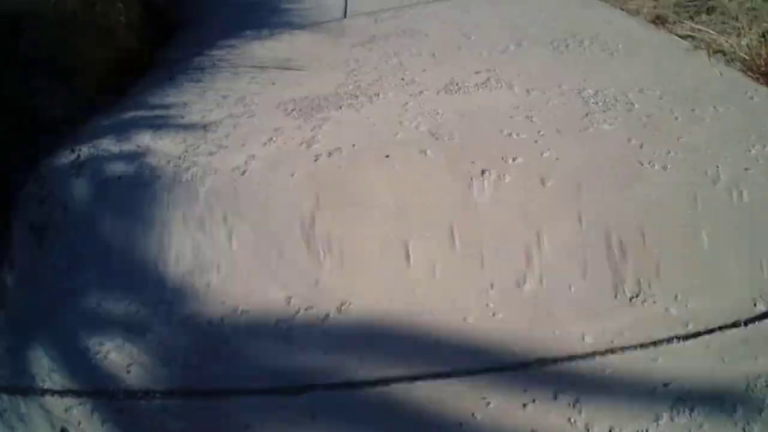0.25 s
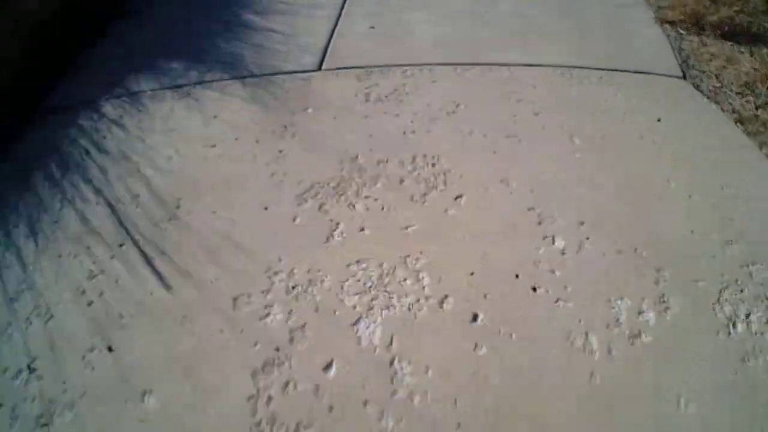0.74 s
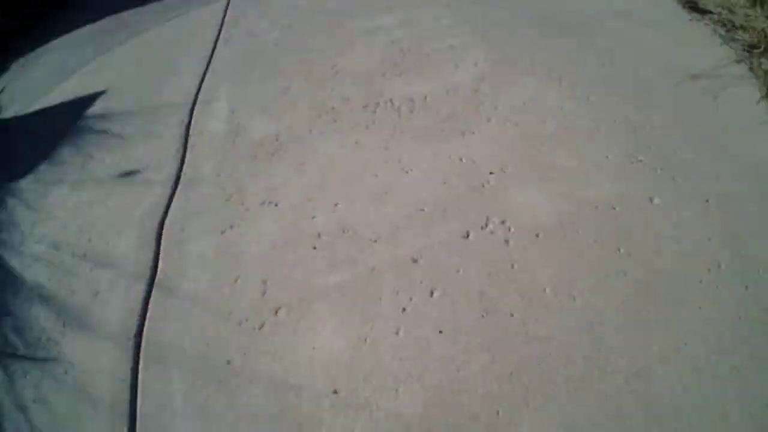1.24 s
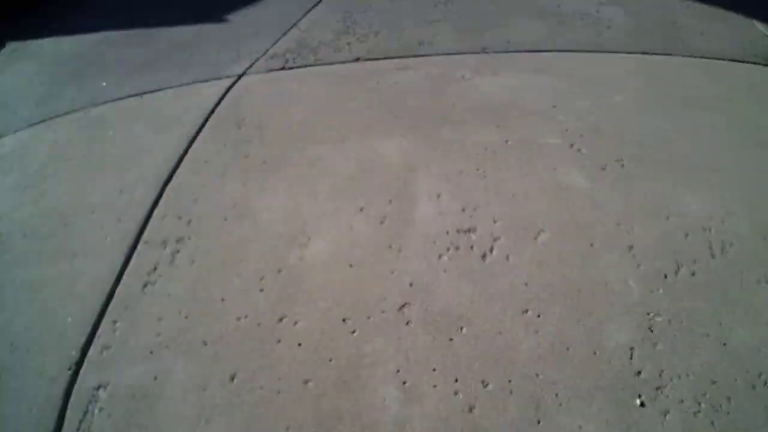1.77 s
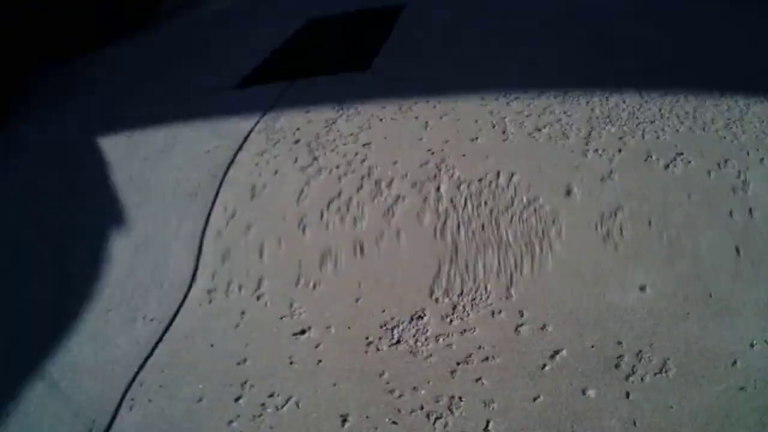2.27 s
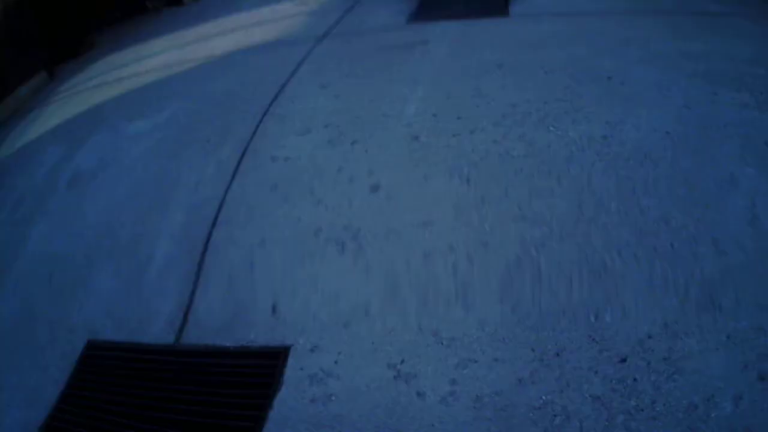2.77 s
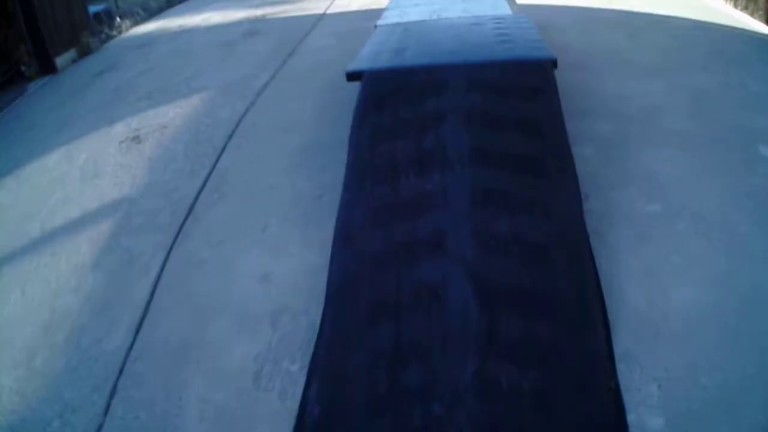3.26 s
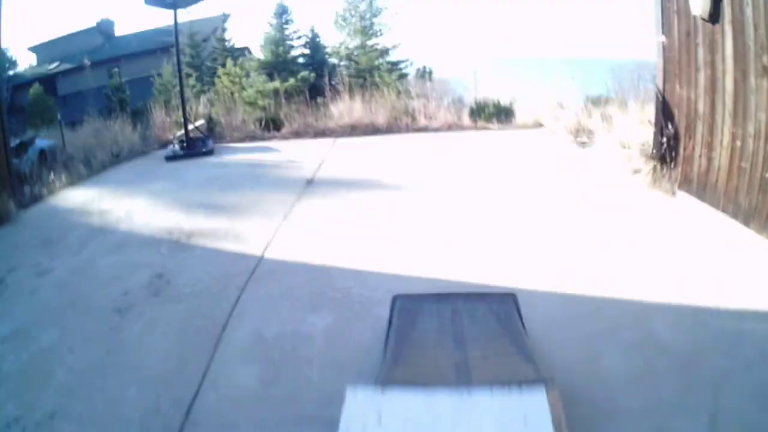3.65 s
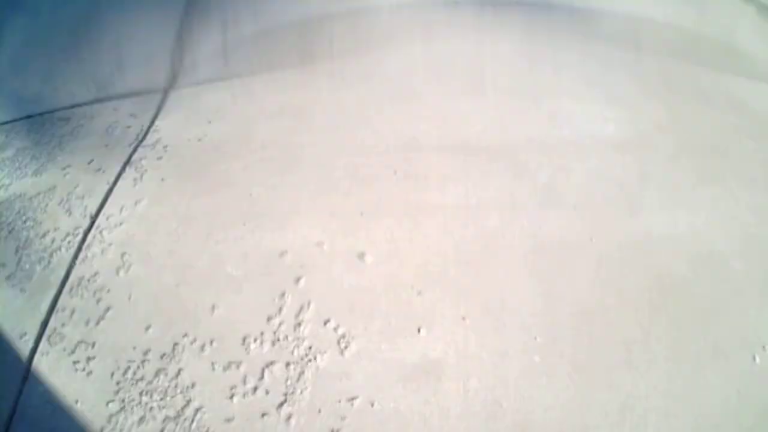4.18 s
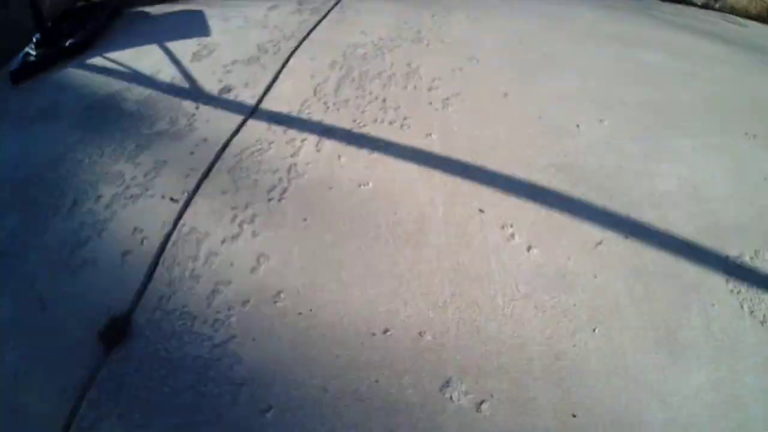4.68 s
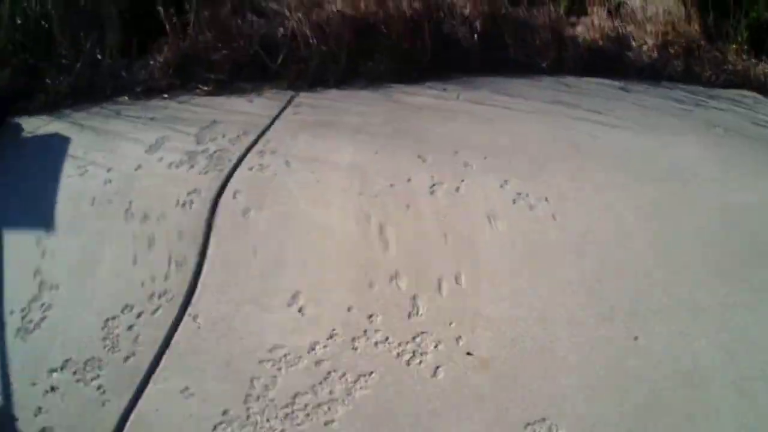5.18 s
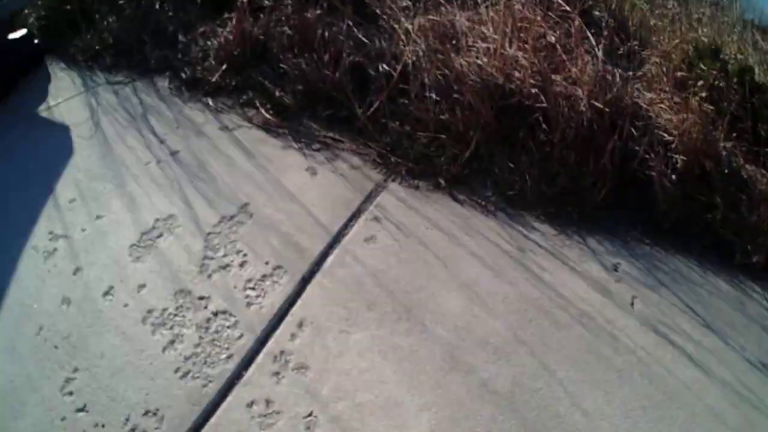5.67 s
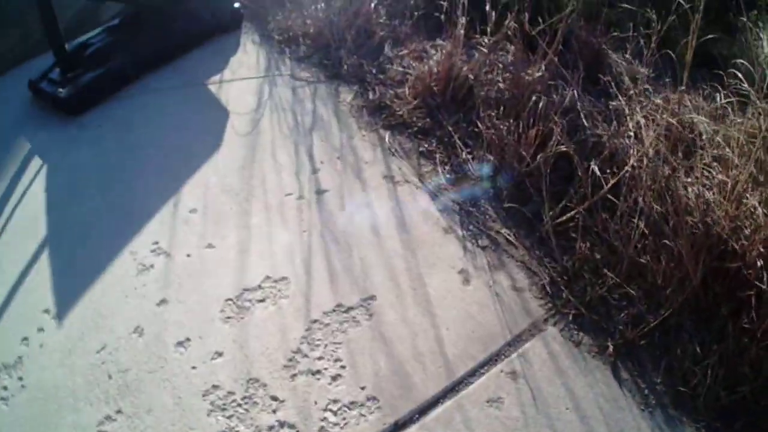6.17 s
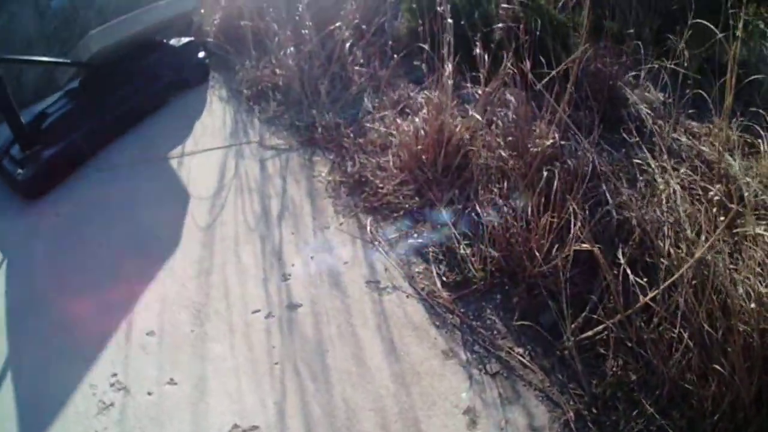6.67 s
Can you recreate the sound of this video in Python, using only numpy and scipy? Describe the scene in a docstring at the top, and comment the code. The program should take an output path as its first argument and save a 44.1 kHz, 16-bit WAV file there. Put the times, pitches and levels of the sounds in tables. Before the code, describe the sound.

Very close, mono, outdoors, from a dull, overloaded microphone on a kick scooter. From 0 s small hard wheels roll slowly over pitted concrete, a gritty low rattle with light clacks. By about 1.1 s it is at speed: a dense, loud, clipped clatter, with front-then-rear wheel clacks at joints and pits, a ringing steering column, booming deck and jingling steel. It surges around 1.6, 2.6 and 3.6 s. Low deck thuds come at 4.1-4.3 s on the ramp. At about 4.45 s the wheels leave the ground: near quiet, a fading bearing whirr, soft air rumble, faint rustle and ticks. At 4.78 s a hard landing slams, and rattling resumes. From 5.3 s a fender brake rubs and judders as the roll slows, nearing a squeal before stopping at 6.46 s. Then small ticks, loose knocks around 6.7-6.9 s, faint rustle, quiet air and low hum.

```python
"""A kick scooter on small hard wheels pushes off over pitted concrete, heard by an overloaded microphone riding on it.
At cruising speed, grain and pits shake the frame; each joint or pit clacks under the front wheel, then the rear.
It runs over a low ramp: the bearings whirr in the air, and the hard landing slams the deck in low thuds.
The fender brake then rubs and judders on the rear wheel, nears a squeal at the stop, and loose parts knock and tick.
Quiet outdoor air and a low hum lie under it all; the clipped microphone channel adds the top treble."""
import sys
import numpy as np
from scipy import signal
from scipy.fft import rfft, irfft, next_fast_len
from scipy.io import wavfile
from scipy.ndimage import uniform_filter1d, map_coordinates

SR = 44100
rng = np.random.default_rng(int(sys.argv[2]) if len(sys.argv) > 2 else 0)


def to_wav(s):
    """Save 16-bit WAV."""
    ch = np.atleast_2d(s).T  # columns
    pcm = np.round(np.clip(ch, -1, 1) * 32767)  # PCM
    wavfile.write(sys.argv[1], SR, pcm.astype(np.int16))


N = 305613
TIME = np.arange(N) / SR
CRUISE_M_PER_S = 4
TAKEOFF_S, LANDING_S, BRAKE_ON_S, STOP_S = 4.435, 4.777, 5.33, 6.46

# the frame's answer to a blow [f/Hz, level/dB]
FRAME_COLOUR = [(20, -29.5), (60, -17), (150, -5.5), (240, -11.5), (400, -3), (560, -0.5), (780, 0),
                (1200, -2.5), (1750, -13), (2500, -17), (3100, -20), (4150, -14), (5000, -25.5),
                (6000, -23)]
# slower-dying modes of the steering column [f/Hz, width/Hz, level/dB]
COLUMN_MODES = [(392, 62, -13), (454.5, 9.1, 15), (646, 49, 0.5), (805.5, 15, 8.5)]
# what a light touch rings in the loose steel parts [f/Hz, width/Hz, level/dB]
LOOSE_MODES = [(433, 13, -12.5), (692, 55, 8.5), (840, 150, 8.5), (1140, 660, -0.5), (1607, 140, 1.5),
               (2700, 1200, -24), (3840, 1300, -6.5), (4560, 760, -11)]
# deck bending [f/Hz, width/Hz, level/dB]
DECK_MODES = [(62, 91, -8), (129, 88, -1), (187.5, 11.5, 0.5), (195.6, 25.6, -3), (467, 168, -0.5)]
# thin steel fittings [f/Hz, level/dB]
FITTINGS_COLOUR = [(200, -33.5), (900, -17.5), (1700, -14), (2400, 1), (3200, -6), (4200, -8.5), (5200, -6)]
# boom of the deck; change as the rider pushes off for the jump; change under light blows
FLEX_DB, JUMP_FLEX_DB, LIGHT_FLEX_DB = -6.5, 6, -1.5
PUSH_S, PUSH_LENGTH_S = 4.246, 0.15
JINGLE_DB, JINGLE_POWER = -14.5, 0.71  # the fittings chatter as this power of the shake


def scooter():
    """Hard blows ring the frame and steering column, light ones the loose parts; both boom the deck and jingle the
    fittings."""
    load = wheel_load(skip_s=0.022, skip_db=-6.0, bounce_hz=48.7, bounce_db=1.75)
    force = (rolling() + clacks()) * grounded() * load
    # crossfade from loose parts to frame and column around an effort of -24 dB
    effort = loudness(force, 0.045)
    hard = 1 / (1 + (amp(-24) / (effort + 1e-6)) ** 4)
    frame = amp(-0.5) * ring(hard * force, colour(FRAME_COLOUR))
    column = amp(-18) * ring(hard * force, modes(COLUMN_MODES))
    loose = amp(-0.5) * ring((1 - hard) * force, modes(LOOSE_MODES))
    bending = ring(force, modes(DECK_MODES))
    boom = filtered(bending, lambda hz: 1 / (1 + 1j * hz / 600))
    push = np.exp(-((TIME - PUSH_S) / PUSH_LENGTH_S) ** 2)
    flex = amp(FLEX_DB + JUMP_FLEX_DB * push + LIGHT_FLEX_DB * (1 - hard))
    # the fittings chatter at their own moments, as hard as they are shaken
    chatter = contacts(rate=140, spread_db=5.5, even_s=0.045, t60=0.02)
    jingle = amp(JINGLE_DB) * loudness(force, 0.011) ** JINGLE_POWER * chatter
    return frame + column + loose + flex * boom + ring(jingle, colour(FITTINGS_COLOUR))


# how rough the ground is: the shake it gives at cruising speed [t/s, level/dB]
ROUGHNESS = [(0, -22.5), (0.14, -15), (0.26, -32.5), (0.40, -11), (0.58, -24.5), (0.95, -16.5),
             (1.35, -18.5), (1.6, -6.5), (2.05, -18.5), (2.58, -6.5), (2.8, -19.5), (2.89, -5.5),
             (3.25, -13), (3.6, -5), (4.15, -11), (4.33, -20.5), (5.0, -13), (5.4, -9.5), (5.53, -23.5),
             (5.88, -19.5), (5.99, -4), (6.12, -14)]
SHAKE_POWER = 1.7  # the shake grows as this power of the speed
GRAINS_PER_M, PITS_PER_M = 375, 42


def rolling():
    """Fine sand grain under the wheels, and sparser pits that each give a knock; denser and louder with speed."""
    grain = amp(-3) * contacts(rate=GRAINS_PER_M * speed(), spread_db=2.5, even_s=.015, t60=0.008)
    pits = amp(1.5) * contacts(rate=PITS_PER_M * speed(), spread_db=1.0, even_s=.035, t60=0.012)
    shake = gain(ROUGHNESS) * (speed() / CRUISE_M_PER_S) ** SHAKE_POWER
    return shake * (grain + pits)


# push off, cruise, slow to a stop [t/s, speed/(m/s)]
SPEED_CURVE = [(0, 1.33), (0.78, 2.94), (1.08, 4), (5.05, 4), (5.705, 1.83), (6.47, 0)]


def speed(t=TIME):
    """Speed in m/s, straight lines between the points of the curve."""
    return np.interp(t, *np.transpose(SPEED_CURVE))


# the parts knock as the rider shifts at rest [t/s, level/dB, t60/s]
REST_KNOCKS = [(6.69, -45, 0.3), (6.779, -25.5, 0.05), (6.813, -38, 0.45), (6.88, -28.5, 0.089),
               (6.898, -31, 0.049)]


def clacks():
    """Each jolt or knock is a first strike, then a dying chatter of the loose deck and steering column."""
    blows = jolts() + REST_KNOCKS
    strikes = decays([(s, db - 6, .035) for s, db, _ in blows]) * rng.standard_normal(N)
    chatter = decays(blows) * contacts(rate=400, spread_db=5.0, even_s=.011, t60=0.017)
    return strikes + chatter


# joints, pits, ramp edges and the landing, timed at the front wheel [t/s, front level/dB, rear level/dB]
GROUND_BUMPS = [(0.033, -35, -19), (0.05, -28, -20.5), (0.172, -17, -12.5), (0.278, -21, -28),
                (0.356, -14, 4), (0.407, -13.5, -20), (0.698, -9, -3), (0.74, -10.5, -7.5),
                (0.777, -15, -7.5), (1.087, 3.5, 5.5), (1.128, 2.5, 3), (1.172, -7.5, -24.5),
                (1.406, 1.5, -0.5), (1.49, -1, -9), (1.674, -1.5, -1), (1.733, -2, -2), (1.777, -5, 1),
                (1.949, 2, 3), (2.001, 2, -2.5), (2.058, -4.5, 2), (2.193, 8, 0.5), (2.243, 5, 9.5),
                (2.268, 3.5, -2), (2.484, 0, -1), (2.678, -3.5, -21), (2.757, -11, -7.5), (2.832, -2, -5),
                (3.023, 3, -6), (3.106, 1, 0), (3.199, 6, -10), (3.285, -1.5, -4), (3.317, -2, -11.5),
                (3.346, -1.5, 6.5), (3.401, 4, -4), (3.758, -1, -3), (3.886, 2, -4.5), (3.954, -10, 0),
                (4.129, -1.5, -7.5), (4.173, 6.5, -16), (4.271, -6, -11.5), (4.349, -1.5, -40),
                (4.777, 7.5, 7), (4.804, 8, 0), (4.831, 2, 0.5), (5.008, 3, -3), (5.082, -3, -1.5),
                (5.201, 1.5, -5.5), (5.32, -8, -29), (5.57, -9.5, -18.5), (5.705, -8, -2),
                (5.724, 0.5, -0.5)]
WHEELBASE_M = 0.55
RATTLE_T60_S = 0.15  # chatter after a bump at cruising speed
RATTLE_PER_SLOWDOWN = 0.3  # the chatter lengthens as this power of the slowdown


def jolts():
    """The front wheel hits each bump, the rear one a wheelbase later: rows of (s, dB, rattle t60 s)."""
    front = [(s, db) for s, db, _ in GROUND_BUMPS]
    rear = [(s + WHEELBASE_M / speed(s), db) for s, _, db in GROUND_BUMPS]
    rows = []
    for s, db in front + rear:
        slowdown = CRUISE_M_PER_S / max(speed(s), 2)
        rows.append((s, db, RATTLE_T60_S * slowdown ** RATTLE_PER_SLOWDOWN))
    return rows


def wheel_load(skip_s, skip_db, bounce_hz, bounce_db):
    """The hard wheels bounce on the concrete, and lose grip just before each jolt, more so at speed."""
    lift = np.zeros(N)
    for s, _, _ in jolts():
        end = round(s * SR)
        start = max(end - int(skip_s * SR), 0)
        rise = np.sin(np.linspace(0, np.pi / 2, end - start))
        lift[start:end] = np.maximum(lift[start:end], rise)
    bounce = ring(rng.standard_normal(N), steep_modes([(bounce_hz, 25, 0)]))
    skip = skip_db * lift * speed() / CRUISE_M_PER_S
    return amp(skip + bounce_db * np.tanh(bounce))


LIFT_OFF_T60_S = 0.12  # the shake dies away as the wheels leave the ground


def grounded():
    """1 while the wheels touch the concrete, dying towards 0 in the air."""
    lifting_off = amp(-60 * np.maximum(TIME - TAKEOFF_S, 0) / LIFT_OFF_T60_S)
    return np.maximum(lifting_off, TIME >= LANDING_S)


# the rider's weight slams the deck down [t/s, level/dB, f/Hz, t60/s]
DECK_THUDS = [(3.21, -35, 61.5, 0.12), (3.6, -9, 75, .15), (4.104, 0, 173, 0.1), (4.181, -12, 47.8, 0.22),
              (4.28, -2, 123, 0.094), (4.46, -27, 164, 0.087), (4.785, -6, 99.5, 0.38),
              (4.923, -13, 51.7, 0.12)]


def thuds():
    """The deck bounces for a few low cycles: decaying sines with a soft onset."""
    out = np.zeros(N)
    t = TIME[:SR // 3]
    for s, db, hz, t60 in DECK_THUDS:
        envelope = amp(db - 60 * t / t60) * (1 - np.exp(-t / 0.00098))
        out[round(s * SR):][:len(t)] += envelope * np.sin(2 * np.pi * hz * t)
    return out


# fender ringing [f/Hz, width/Hz, level/dB]
FENDER_MODES = [(177.5, 22, 2.5), (440, 220, -4), (745, 96, 5), (980, 100, -2.5), (1040, 110, 0.5),
                (1380, 210, 1), (1600, 250, -2), (2380, 590, -11.5), (3030, 170, -5), (3430, 640, -7),
                (4270, 770, -7.5)]
BRAKE_DB, BRAKE_DB_PER_M_S = -33, 2.5  # rubbing at a crawl; louder with speed
SQUEAL_DB, SQUEAL_DB_PER_M_S = -30.5, -9.5  # squeal at the stop; weaker with speed
JUDDER_HZ, JUDDER_DEPTH = 50.4, 0.11


def brake():
    """Dense slips of the wheel under the juddering fender; just before the stop they lock towards a squeal."""
    slips = contacts(rate=560, spread_db=4.5, even_s=0.01, t60=0.019)
    rub = amp(BRAKE_DB + BRAKE_DB_PER_M_S * speed()) * ring(slips, modes(FENDER_MODES))
    howl = ring(rng.standard_normal(N), steep_modes([(915, 130, 0), (1360, 150, -1)]))
    squeal = amp(SQUEAL_DB + SQUEAL_DB_PER_M_S * speed()) * howl
    judder = 1 + JUDDER_DEPTH * np.sin(2 * np.pi * JUDDER_HZ * TIME + wobble(8.6))
    pressure = held(BRAKE_ON_S, STOP_S, attack_s=.13, release_s=0.046) * judder
    return pressure * (rub + squeal)


# free wheel ringing [f/Hz, width/Hz, level/dB]
WHEEL_MODES = [(222, 120, -7), (426, 60, -7), (756, 76, -1), (1050, 250, -20), (1620, 130, -23)]
SPIN_DB, SPIN_DB_PER_S = -46, -18  # bearings at take-off; they run down in the air


def free_wheels():
    """In the air only the bearings whirr, while the air stream rumbles softly on the microphone."""
    balls = rng.standard_normal(N) * amp(5.3 * wobble(50))
    whirr = filtered(ring(balls, modes(WHEEL_MODES)), lambda hz: 1 / (1 + (hz / 2100) ** 6))
    zing = amp(-15) * ring(balls, steep_modes([(3400, 350, 0)]))
    spin = amp(SPIN_DB + SPIN_DB_PER_S * np.clip(TIME - TAKEOFF_S, 0, 1))
    rumble = colour([(25, -10), (70, -8), (150, -15.5), (500, -38), (2000, -74)])
    stream = amp(-44.5) * ring(rng.standard_normal(N), rumble)
    return (1 - grounded()) * (spin * (whirr + zing) + stream)


# small dry ticks of the loose fittings while the wheels are unloaded or at rest [t/s, level/dB]
FITTING_TICKS = [(4.538, -33), (4.576, -45), (4.698, -46), (4.717, -52), (4.744, -26.5), (6.487, -55),
                 (6.537, -45), (6.681, -47), (6.705, -37), (6.718, -32), (6.762, -35)]
# clothes and grips rustle at take-off and after the stop [start t/s, end t/s, level/dB]
RUSTLE_MOVES = [(4.47, 4.57, -47), (6.667, 6.93, -48.5)]
# a tick's ring [f/Hz, width/Hz, level/dB]
TICK_MODES = [(780, 200, -8), (1600, 360, 2.5), (2900, 920, -6), (4150, 450, 4.5), (4870, 460, -16)]


def ticks():
    """Loose fittings settle against each other amid a faint rustle: noise bursts through the tick's modes."""
    clicks = decays([(s, db, .022) for s, db in FITTING_TICKS]) * rng.standard_normal(N)
    moves = sum(amp(db) * held(start, end, attack_s=0.014, release_s=0.14) for start, end, db in RUSTLE_MOVES)
    rustle = moves * contacts(rate=330, spread_db=8, even_s=.04, t60=0.011)
    return ring(clicks + rustle, modes(TICK_MODES))


# distant outdoor air [f/Hz, level/dB]
AIR_COLOUR = [(20, -11), (70, -7), (120, -7.5), (180, -2), (300, -9.5), (430, -7), (560, -7.5), (800, -4.5),
              (1400, -12.5), (2000, -23), (4200, -35), (6000, -50)]
# low hum, before its wavering [f/Hz, level/dB]
HUM_TONES = [(64.6, -53), (167, -66)]


def background():
    """Quiet outdoor air as coloured noise, and a low hum wavering in level and phase."""
    hum = np.zeros(N)
    for hz, db in HUM_TONES:
        level = np.sqrt(2) * amp(db + 2.5 * wobble(25))
        hum += level * np.sin(2 * np.pi * hz * TIME + .35 * wobble(9.9))
    return hum + amp(-51.5) * ring(rng.standard_normal(N), colour(AIR_COLOUR))


def contacts(rate, spread_db, even_s, t60):
    """Random brief crunches of scattered size, rate a second, evened to about rms 1 over even_s."""
    blows = (rng.random(N) < rate / SR) * amp(spread_db * rng.standard_normal(N)) ** 2
    decay = amp(-60 * TIME[:SR // 8] / t60) ** 2
    power = np.abs(signal.fftconvolve(blows, decay)[:N])
    mean = np.abs(uniform_filter1d(power, max(int(even_s * SR), 2)))
    return np.sqrt(power / (mean + 1e-6 * np.mean(power))) * rng.standard_normal(N)


def decays(rows):
    """Summed envelope of (s, dB, t60 s) bursts, added as powers."""
    power = np.zeros(N)
    for s, db, t60 in rows:
        start = round(s * SR)
        t = TIME[:min(SR // 3, N - start)]
        power[start:start + len(t)] += amp(db - 60 * t / t60) ** 2
    return np.sqrt(power)


def held(start, end, attack_s, release_s):
    """Rises from start, holds until end, then dies by 60 dB in release_s."""
    rise = np.clip((TIME - start) / attack_s, 0, 1)
    return rise * amp(-60 * np.maximum(TIME - end, 0) / release_s)


def wobble(rate):
    """A smooth random curve, rate knots a second."""
    return map_coordinates(rng.standard_normal(int(N * rate / SR) + 4), [TIME * rate])


def modes(rows):
    """Causal response of (Hz, width Hz, dB) resonances, alternating in sign."""
    def response(hz):
        total = 0
        for k, (centre, width, db) in enumerate(rows):
            damping = 1j * hz * width
            total = total + (-1) ** k * amp(db) * damping / (centre ** 2 - hz ** 2 + damping)
        return total
    return response


def steep_modes(rows):
    """Resonances passed twice, for steeper skirts."""
    return lambda hz: modes(rows)(hz) ** 2


def colour(points):
    """Causal minimum-phase response with the gains of (Hz, dB) points."""
    def response(hz):
        f, db = np.transpose(points)
        gains = amp(np.interp(np.log(hz + 1), np.log(f), db))
        # folding the cepstrum forward in time gives the minimum phase
        cepstrum = irfft(np.log(gains))
        cepstrum[1:len(hz) - 1] *= 2
        cepstrum[len(hz):] = 0
        return np.exp(rfft(cepstrum))
    return response


def ring(force, body):
    """A body driven by a broadband force, keeping the force's level."""
    def response(hz):
        h = body(hz)
        return h / np.sqrt(np.mean(np.abs(h) ** 2))
    return filtered(force, response)


def filtered(x, response):
    """x times a complex response of frequency, padded so that tails do not wrap round."""
    size = 2 * next_fast_len(N // 2 + SR // 4)
    return irfft(rfft(x, size) * response(np.fft.rfftfreq(size, 1 / SR)), size)[:N]


def loudness(x, seconds):
    """Running rms."""
    return np.sqrt(np.abs(uniform_filter1d(x ** 2, int(seconds * SR))))


def gain(rows):
    """(s, dB) rows as one gain per sample."""
    return amp(np.interp(TIME, *np.transpose(rows)))


def amp(db):
    """Decibels as an amplitude factor."""
    return 10 ** (np.asarray(db) / 20)


def scene():
    """Scooter and surroundings at the microphone."""
    return (scooter() + thuds() + brake() + free_wheels() + ticks() + background())[None]


def overload(x, ceiling, hardness):
    """Flat-topped clipping with a narrow knee."""
    return x / (1 + np.abs(x / ceiling) ** hardness) ** (1 / hardness)


# colour after the overloaded input, taken relative to the first row [f/Hz, level/dB]
PRESENCE_COLOUR = [(5000, 1), (6500, -8), (8200, -6), (10000, -1), (16000, -1.5)]
MICROPHONE_HZ, TOP_HZ = 5200, 16000  # treble edge before the clipping; cutoff after it


def record(dry):
    """A dull microphone channel overloads; its clipping makes the top treble."""
    dull = filtered(dry[0], lambda hz: 1 / np.sqrt(1 + (hz / MICROPHONE_HZ) ** 30 + (hz / 5650) ** 90))
    clipped = overload(dull, ceiling=.74, hardness=10)
    f, db = np.transpose(PRESENCE_COLOUR)
    return filtered(clipped, lambda hz: (hz < TOP_HZ) * amp(np.interp(hz, f, db - db[0])))[None]


dry = scene()
out = record(dry)
to_wav(out)
```